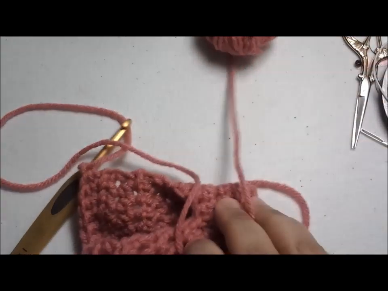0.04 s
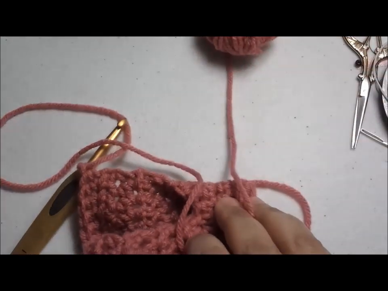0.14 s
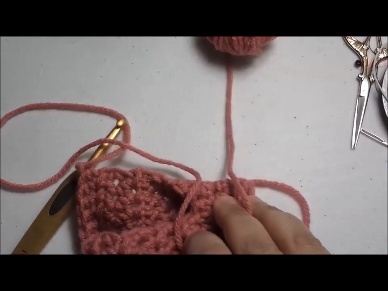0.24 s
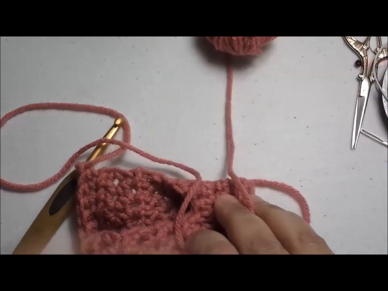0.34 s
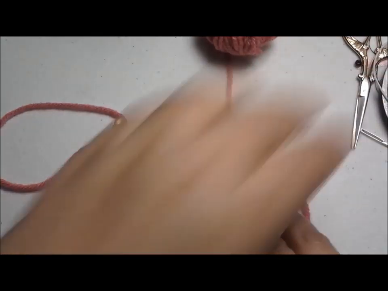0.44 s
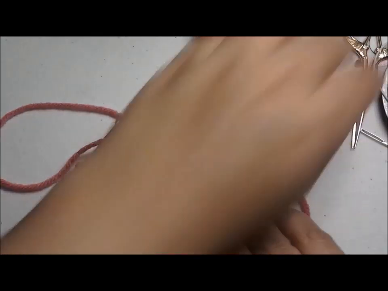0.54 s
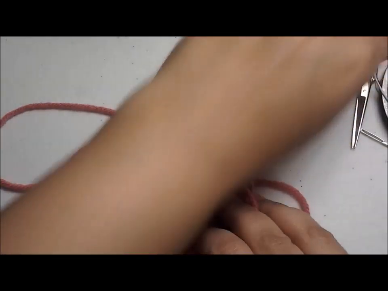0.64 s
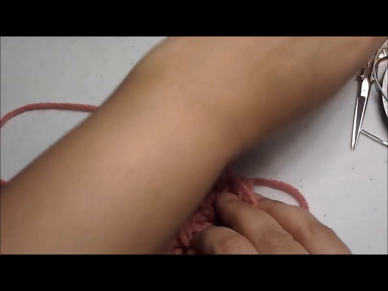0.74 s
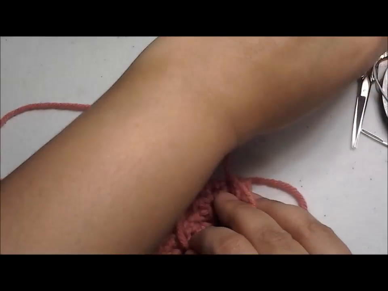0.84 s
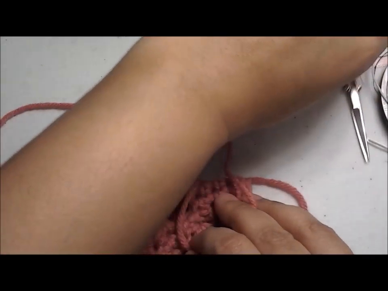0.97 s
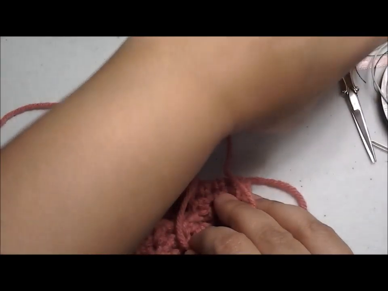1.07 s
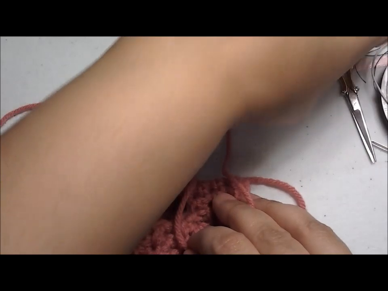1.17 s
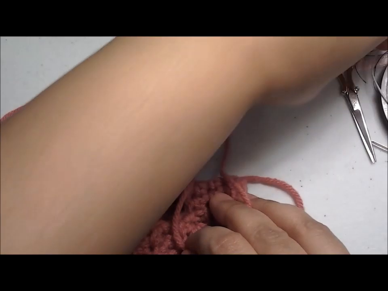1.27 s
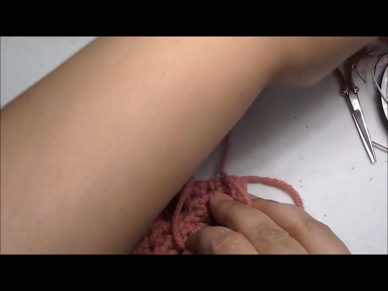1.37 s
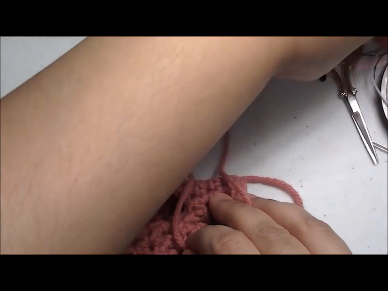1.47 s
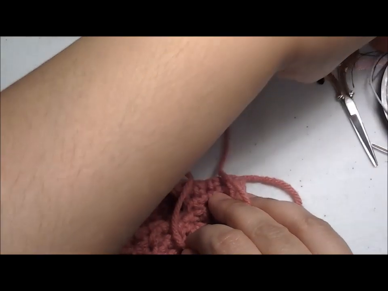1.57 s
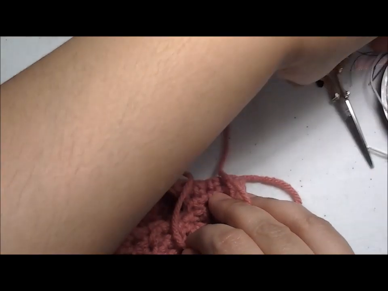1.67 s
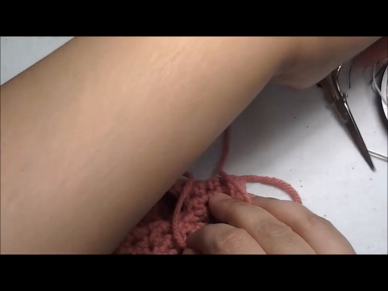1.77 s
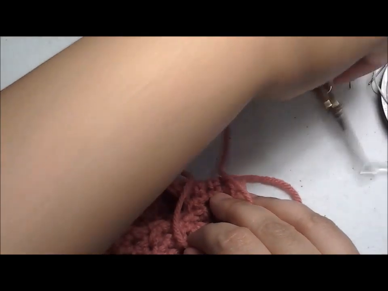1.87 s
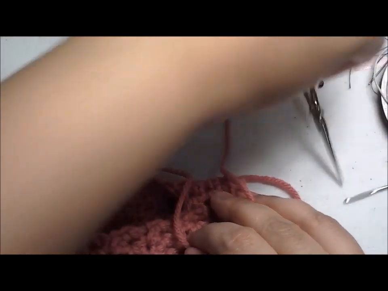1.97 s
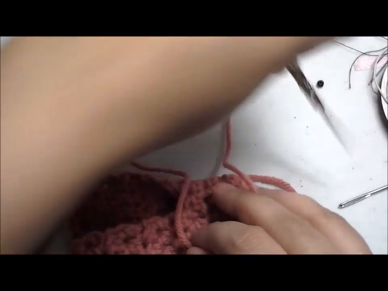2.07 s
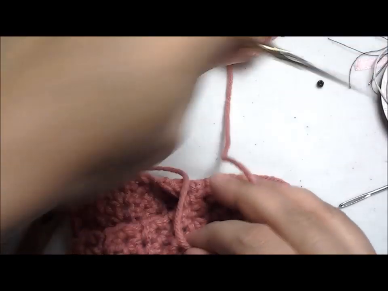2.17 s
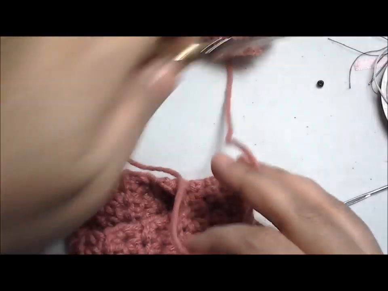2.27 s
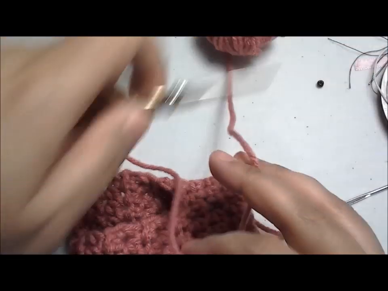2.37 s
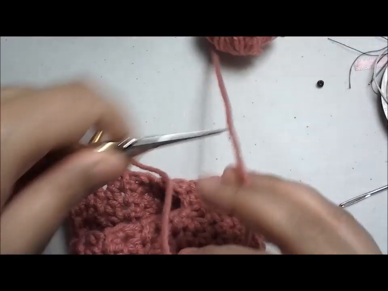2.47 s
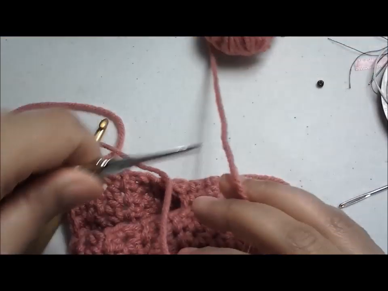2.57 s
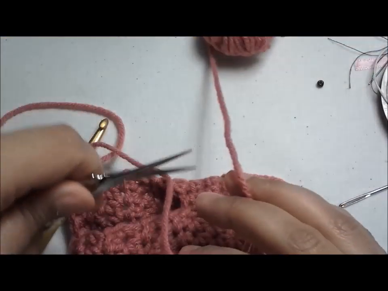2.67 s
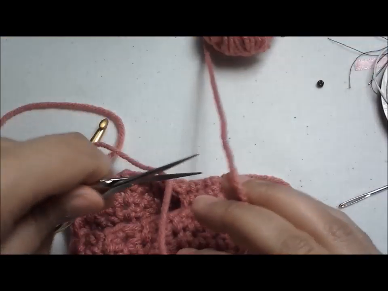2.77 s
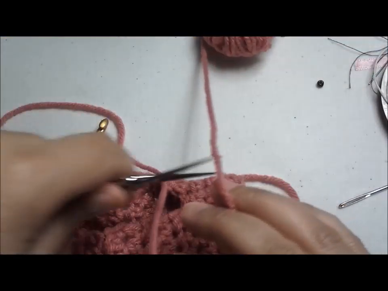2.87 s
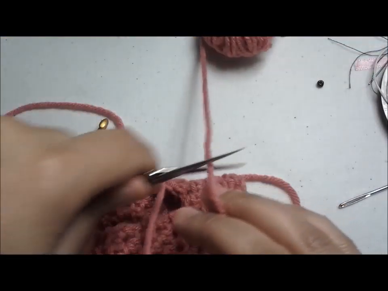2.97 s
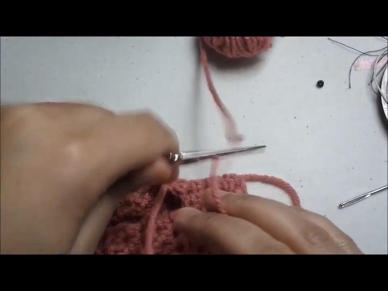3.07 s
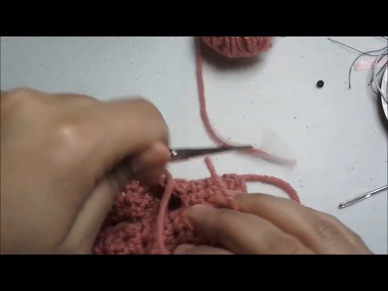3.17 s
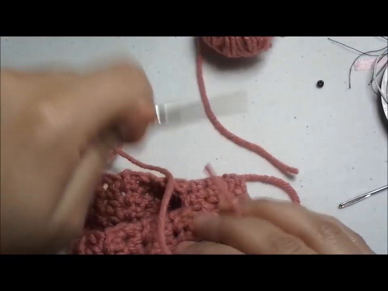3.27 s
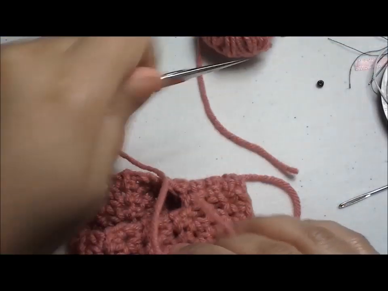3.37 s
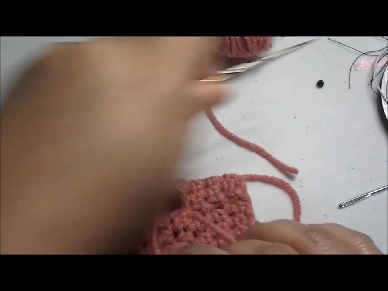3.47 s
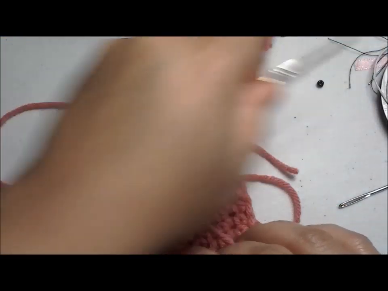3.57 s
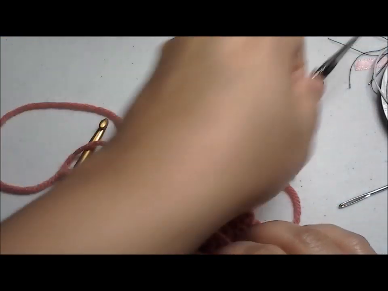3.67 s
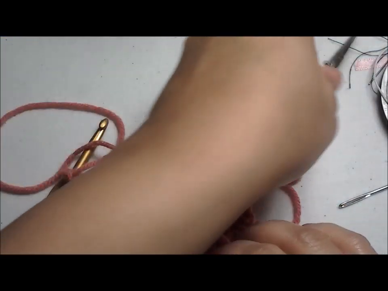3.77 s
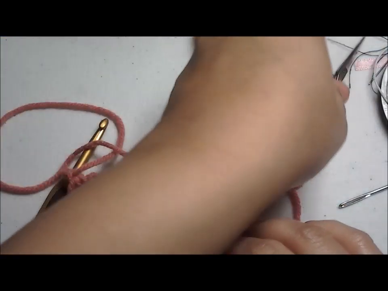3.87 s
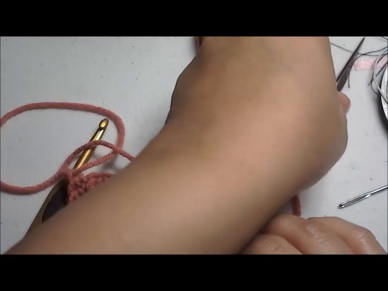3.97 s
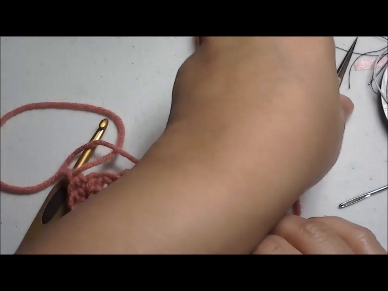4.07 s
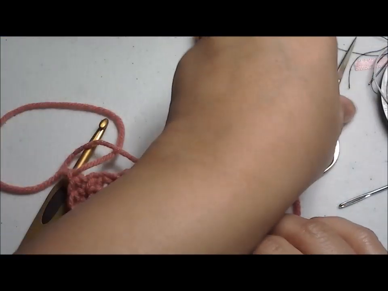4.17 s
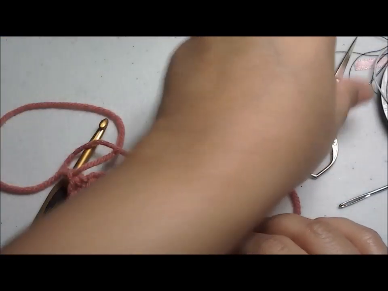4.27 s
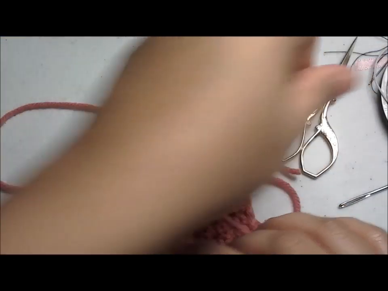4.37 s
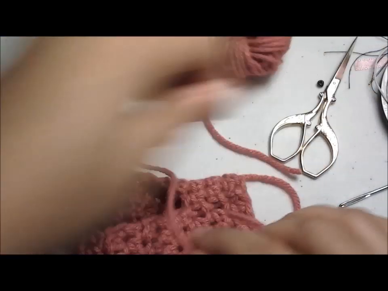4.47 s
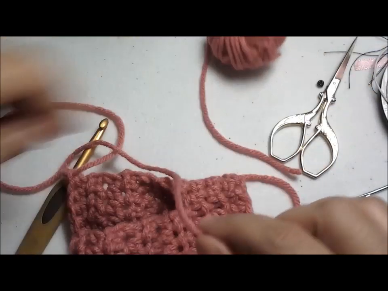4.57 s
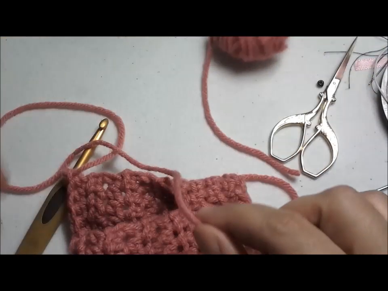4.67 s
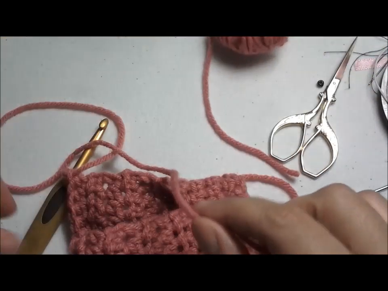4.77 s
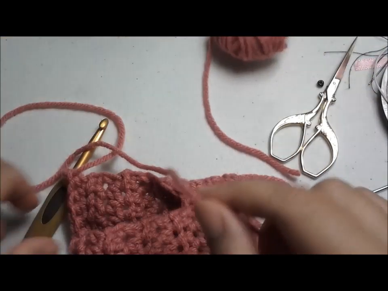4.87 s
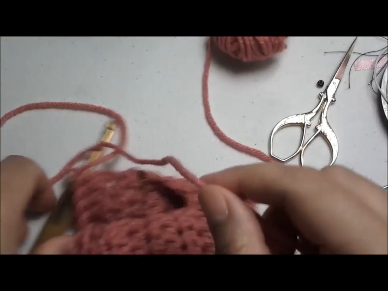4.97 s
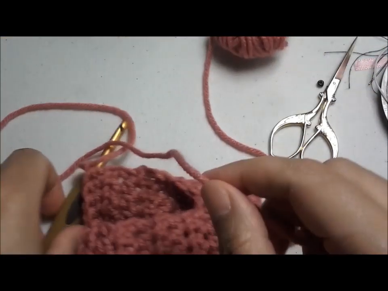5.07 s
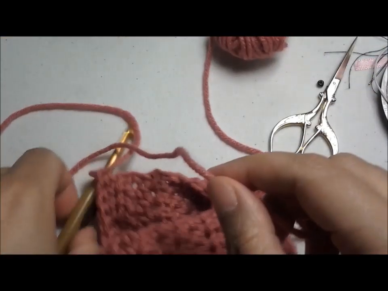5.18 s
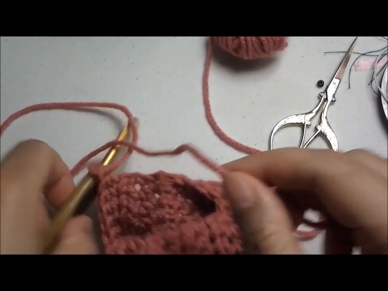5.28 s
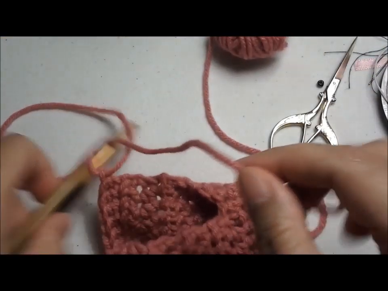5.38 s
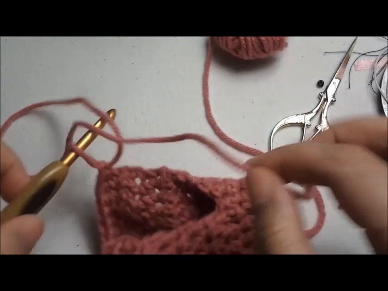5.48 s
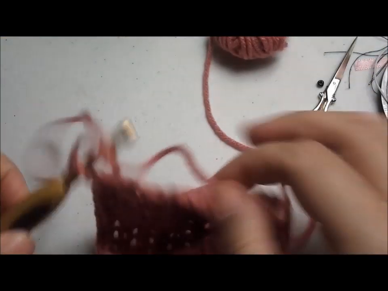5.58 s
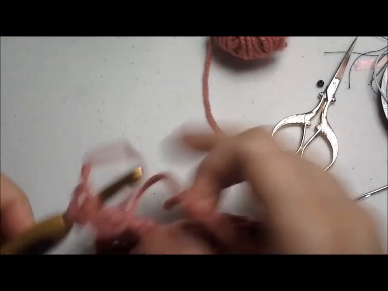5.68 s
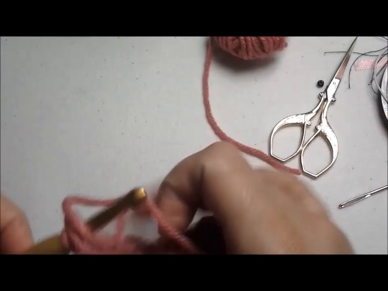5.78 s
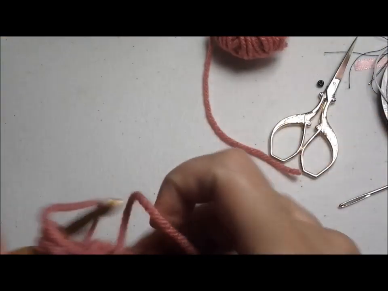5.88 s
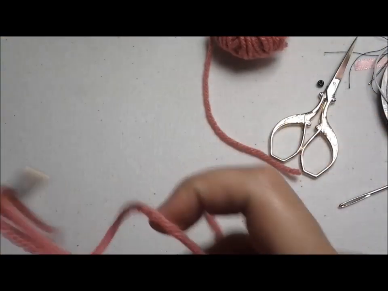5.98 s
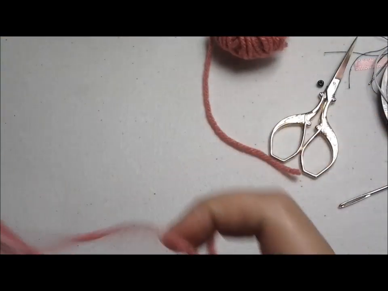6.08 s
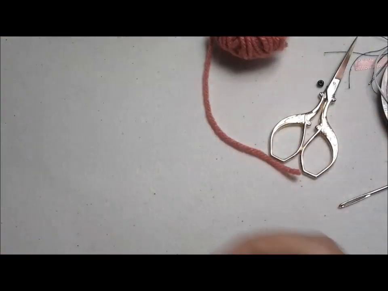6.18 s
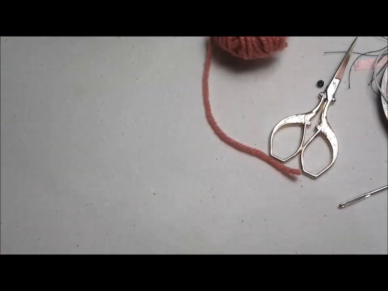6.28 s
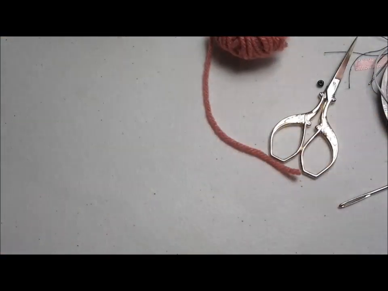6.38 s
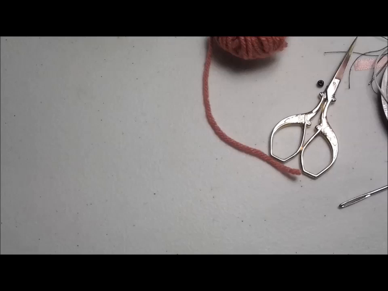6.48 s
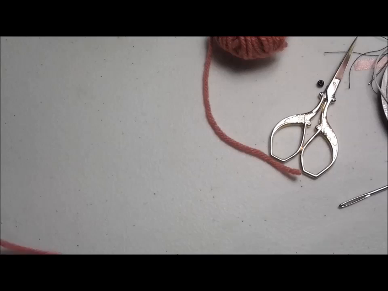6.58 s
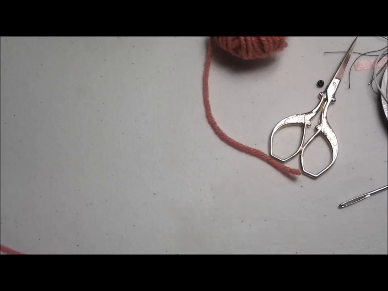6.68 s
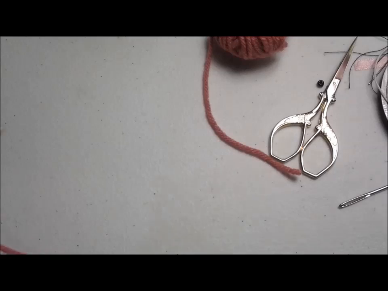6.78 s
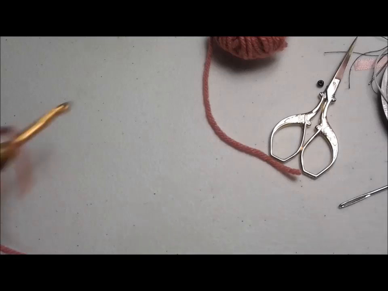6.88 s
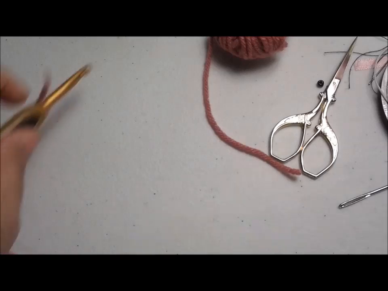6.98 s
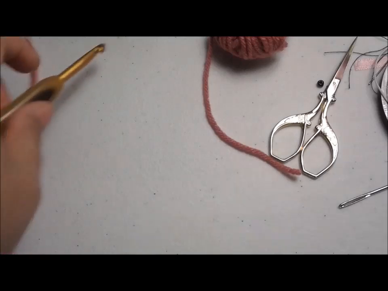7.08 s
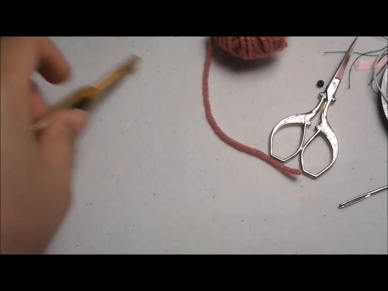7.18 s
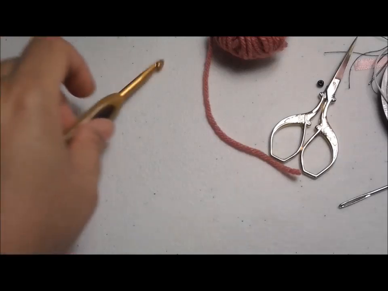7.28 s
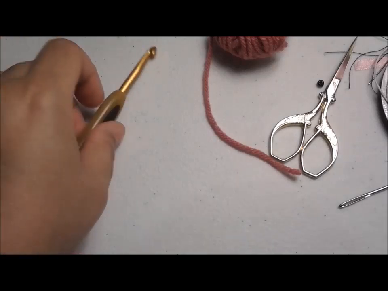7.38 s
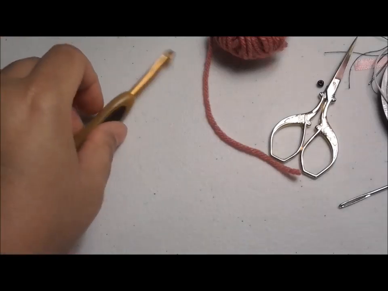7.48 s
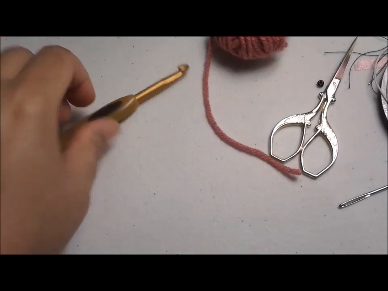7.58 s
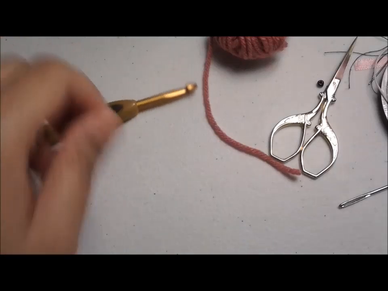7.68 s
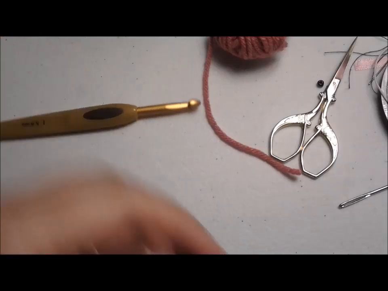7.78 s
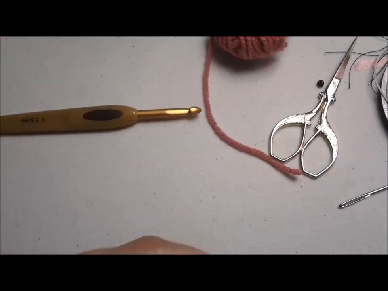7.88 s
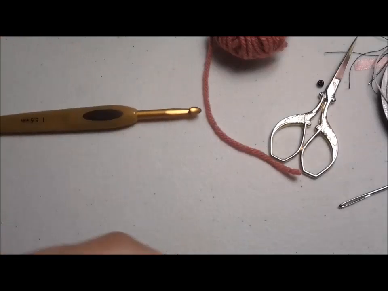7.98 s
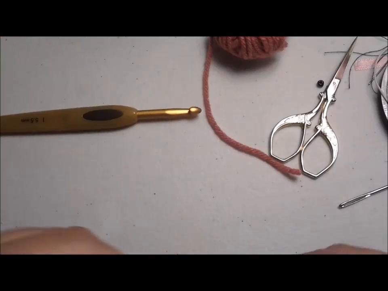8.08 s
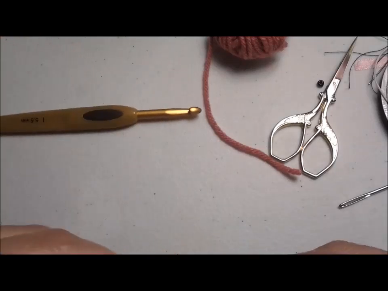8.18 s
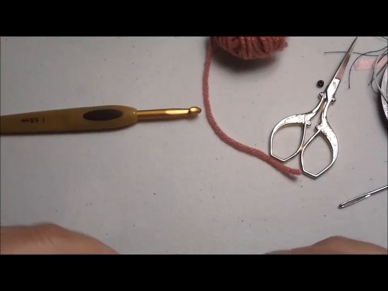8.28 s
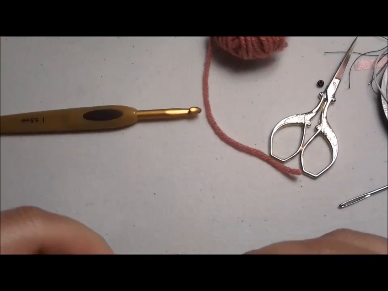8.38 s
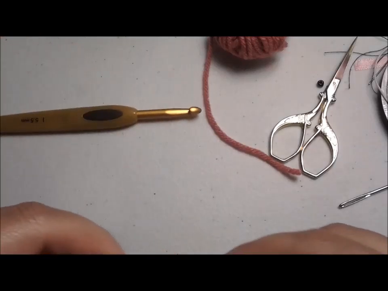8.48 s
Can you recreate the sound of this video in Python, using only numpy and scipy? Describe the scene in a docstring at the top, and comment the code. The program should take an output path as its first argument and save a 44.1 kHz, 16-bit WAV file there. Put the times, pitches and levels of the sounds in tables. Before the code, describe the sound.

Small scissors scrape off a table, snip yarn and clatter back down, then a crochet hook taps the tabletop over a low hum.

```python
"""A small room with a humming appliance. Small steel scissors are dragged off a table, snip a strand of
yarn and are dropped back; a crochet hook is picked up and laid down. Table contacts ring bright treble
resonances and the top's boom and knock: taps as a few quick clicks, slides as random bumps.
The blades crunch through the fibres and click shut; wool and sleeve brush with a soft hiss."""
import sys
import numpy as np
from scipy import signal
from scipy.fft import rfft, irfft, next_fast_len
from scipy.io import wavfile

SR = 44100
rng = np.random.default_rng(int(sys.argv[2]) if len(sys.argv) > 2 else 0)


def materialize(psi):
    """Save the field psi as 16-bit PCM at rate SR to the path in sys.argv[1].

    A 1-D psi becomes a single channel; in a 2-D psi each row is a channel.
    """
    bounded = np.clip(np.atleast_2d(psi).T, -1, 1)
    quanta = np.round(bounded * 32767).astype(np.int16)
    wavfile.write(sys.argv[1], SR, quanta)


N = 376613


def from_db(db):
    """Gain of a level in dB."""
    return 10 ** (np.asarray(db) / 20)


def rms_one(x):
    """Scale to rms 1."""
    return x / np.sqrt(np.mean(x ** 2) + 1e-20)


def butter(x, order, hz, kind):
    """Butterworth filter."""
    return signal.sosfilt(signal.butter(order, hz, kind, fs=SR, output="sos"), x)


def drift(rate_hz):
    """Slow random wander, rms 1."""
    step = 40
    r = np.exp(-2 * np.pi * rate_hz * step / SR)
    slow = signal.lfilter([1], [1, -2 * r, r * r], rng.standard_normal(N // step + 2002))[2000:]
    return np.interp(np.arange(N) / step, np.arange(len(slow)), rms_one(slow))


def strokes(start_s, hold_s, level_db, rise_db_per_s, fall_db_per_s):
    """Gain of movements that swell, hold and fade."""
    t, top_db = np.arange(0, N, 32) / SR, -200
    for start, hold, db in zip(start_s, hold_s, level_db):
        rise_db = rise_db_per_s * np.maximum(start - t, 0)
        fall_db = fall_db_per_s * np.maximum(t - start - hold, 0)
        top_db = np.maximum(top_db, db - rise_db - fall_db)
    return np.interp(np.arange(N) / SR, t, from_db(top_db))


def decay(clicks, t60_s):
    """Exponential tail after each click."""
    return signal.lfilter([1], [1, -from_db(-60 / (t60_s * SR))], clicks + 1e-18)


def ring(clicks, hz, t60_s):
    """One mode: a unit click starts a decaying sine of height 1."""
    r, w = from_db(-60 / (t60_s * SR)), 2 * np.pi * hz / SR
    return signal.lfilter([0, np.sin(w)], [1, -2 * r * np.cos(w), r * r], clicks + 1e-18)


def near(centre_hz, db_per_oct, second_hz=None, second_db=0.):
    """Mode weighting in dB: falls away from the one or two rings a contact favours."""
    def away(hz, centre):
        return -db_per_oct * np.abs(np.log2(hz / centre))
    if second_hz is None:
        return lambda hz: away(hz, centre_hz)
    return lambda hz: np.maximum(away(hz, centre_hz), second_db + away(hz, second_hz))


def struck(modes, t_s, peak_db, favour, spread_db, span_s=0., contacts=1, swell_t60_s=None):
    """Blows of quick, weakening contacts; each hits every mode with its own strength and sign."""
    late = np.sort(rng.random((len(t_s), contacts)), axis=1)
    late_s = (late - late[:, :1]) * np.reshape(span_s, (-1, 1))
    at = np.round((np.reshape(t_s, (-1, 1)) + late_s) * SR).astype(int)
    rebound_db = -3.5 * np.arange(contacts)
    luck = rng.standard_normal((len(t_s), len(modes), 2, contacts))
    out = np.zeros(N)
    for k, (hz, level_db, t60_s) in enumerate(modes):
        blow_db = np.reshape(peak_db + level_db + favour(hz), (-1, 1)) + rebound_db
        drive = np.zeros(N)
        np.add.at(drive, at, from_db(blow_db + spread_db * luck[:, k, 0]) * np.sign(luck[:, k, 1]))
        if swell_t60_s:   # a burst at the mode's pitch: the ring swells before it dies
            drive = ring(drive, hz, swell_t60_s) * 2 * np.log(1000) / (swell_t60_s * SR)
        out += ring(drive, hz, t60_s)
    return out


# Spot touched by each handling: from t/s, scratch f/Hz, second treble ring f/Hz, its level/dB,
# treble fall-off/(dB/oct), boom centre f/Hz, knock centre f/Hz, chatter level/dB, lead-in level/dB
SPOTS = [(0.0, 3140, 5000, -6, 15, 198, 670, -1, -22), (0.9, 3600, 5000, -7, 16, 384, 1210, -1, -12),
         (1.3, 3530, 5000, -5, 40, 250, 1200, -0.5, -3), (1.52, 3500, 6600, -8.5, 27, 254, 990, -4.5, -1),
         (1.6, 3530, 5400, -2, 23, 252, 1180, -4, -6), (1.85, 3540, 4500, -5, 37, 384, 1100, -3.5, -18),
         (3.5, 4400, 3500, -4, 40, 320, 780, -1.5, -25), (4.02, 3440, 5000, -4.5, 25, 320, 687, 0.5, -24),
         (4.24, 4900, 3700, -3, 17.5, 278, 644, -1, -12), (4.275, 4900, 3800, -2.5, 24, 201, 1405, 0, -25),
         (4.301, 3900, 5000, -9, 25, 283, 608, -2, -13), (4.32, 4870, 3800, 0.5, 13, 218, 640, -6.5, -21),
         (4.348, 3780, 5000, -16, 30, 180, 1110, -4, -20), (5.0, 3340, 5300, -4.5, 37, 230, 745, -2.5, -7),
         (5.249, 3260, 2380, -2, 26.5, 201, 647, -4.5, -14), (5.29, 3400, 2380, 0, 25, 294, 645, -2, -15),
         (7.3, 3610, 5000, -1.5, 45, 203, 810, -1.5, -17),
         (7.43, 3570, 5200, -7.5, 42, 277, 604, -1.5, -17), (7.599, 3600, 5200, -7, 45, 252, 652, 1, -2),
         (7.69, 3500, 5200, -7, 41, 267, 640, 4, -10), (8.1, 5560, 3600, -1, 20, 201.6, 830, 2, -20)]


def spot(t_s):
    """Row of SPOTS in use at each time."""
    return np.maximum(np.searchsorted(np.array(SPOTS)[:, 0], t_s, "right") - 1, 0)


def rubbed(modes, gain, bumps_per_s, uneven_db, favour=None):
    """Random, uneven surface bumps ring the modes, most those the spot favours."""
    sizes = from_db(uneven_db * np.minimum(rng.exponential(1, N), 3)) * rng.choice([-1, 1], N)
    bumps = gain * rms_one(sizes * (rng.random(N) < bumps_per_s / SR))
    # a steadily fed mode builds up with the root of its ring time
    build_up = np.sqrt(sum(from_db(2 * db) * t60_s for _, db, t60_s in modes) * SR / (4 * np.log(1000)))
    out, rows = np.zeros(N), spot(np.arange(N) / SR)
    for k, (hz, level_db, t60_s) in enumerate(modes):
        weight = 1 if favour is None else from_db(favour(hz))[rows]
        out += (-1) ** k * from_db(level_db) * ring(bumps * weight, hz, t60_s)
    return out / build_up


# Room noise spectrum: f/Hz, relative density/dB
AIR_SPECTRUM = [(25, -25.5), (40, -13.5), (60, 1.5), (95, 2), (135, 0.5), (165, -7.5), (225, -5),
                (290, -11.5), (373, -19.5), (500, -14.5), (850, -17), (1300, -18.5), (1800, -26),
                (2300, -27), (3200, -28.5), (5000, -27.5), (7300, -35.5), (8000, -53), (9000, -71)]


def room_tone(level_db=-55):
    """Steady coloured noise of air and microphone."""
    size = next_fast_len(N)
    bin_hz = np.maximum(np.fft.rfftfreq(size, 1 / SR), 1)
    hz, db = np.transpose(AIR_SPECTRUM)
    colour = from_db(np.interp(np.log(bin_hz), np.log(hz), db))
    air = irfft(rfft(rng.standard_normal(size)) * colour, size)[:N]
    return from_db(level_db + 0.45 * drift(rate_hz=0.94)) * rms_one(air)


# Motor lines: f/Hz, rms level/dB
HUM_LINES = [(120, -52), (835, -78), (1663, -81.5)]


def appliance_hum():
    """A motor's steady lines, each wavering slightly in level."""
    t = np.arange(N) / SR
    return sum(np.sqrt(2) * from_db(db + 0.24 * drift(rate_hz=3.4)) * np.sin(2 * np.pi * hz * t)
               for hz, db in HUM_LINES)


def reflections(x, t60_s=0.28, level_db=-8.5, gap_s=0.00042):
    """Dense room reflections: a noise tail dying away after a short gap."""
    t = np.arange(SR // 2) / SR
    tail = rng.standard_normal(len(t)) * from_db(-60 * t / t60_s) * (t > gap_s)
    return from_db(level_db) * signal.fftconvolve(x, tail / np.linalg.norm(tail))[:N]


# Wool and sleeve movements: t/s, hold/s, level/dB
BRUSH_STROKES = [(3.52, .05, -72), (3.637, 0.033, -66), (4.69, 0.17, -72), (5.633, .27, -75),
                 (5.929, 0.5, -68), (6.806, 0.31, -76)]
# Fibre hiss bands: f/Hz, width/Hz, relative level/dB
BRUSH_BANDS = [(3780, 600, -6), (4240, 740, 7), (5700, 400, 5)]


def brushing():
    """Soft fibres give a smooth hiss in a few wide bands."""
    hiss = sum(from_db(db) * signal.lfilter(*signal.iirpeak(hz, hz / width_hz, SR), rng.standard_normal(N))
               for hz, width_hz, db in BRUSH_BANDS)
    return strokes(*np.transpose(BRUSH_STROKES), rise_db_per_s=254, fall_db_per_s=93) * rms_one(hiss)


# Bright treble resonances heard in every table contact: f/Hz, level/dB, t60/s
TREBLE_MODES = [(2380, 0.5, 0.0096), (2654, -16.5, 0.0046), (3090, 6, 0.0051), (3185, -14.5, 0.058),
                (3423, 0.5, 0.0075), (3590, -1, 0.016), (3733, -3.5, 0.017), (3936, -3, 0.013),
                (4200, -2.5, 0.0036), (4140, -6.5, .02), (4420, -0.5, 0.0098), (4480, -2, 0.0061),
                (4830, 3.5, 0.0068), (5294, -3, 0.012), (5090, -5, 0.0054), (5540, 0, 0.0082),
                (5980, -3.5, 0.013), (6230, -5.5, 0.0084), (6630, -4.5, 0.0078), (7270, -16, 0.0039)]
# Table top modes, low boom and higher knock: f/Hz, level/dB, t60/s
BOOM_MODES = [(86, -7, .15), (126, 4, 0.15), (157.4, -1, 0.099), (215.5, -0.5, 0.074), (260, -3, 0.055),
              (301.6, 2, 0.06), (340.3, 0.5, 0.079), (374, 3, 0.062), (433, -1, 0.07)]
KNOCK_MODES = [(485, -0.5, 0.025), (641.4, -4.5, 0.051), (741, -1.5, 0.031), (836, -1, 0.019),
               (1011, -4, 0.024), (1195, -3, 0.028), (1321, -2.5, 0.035), (1538, -3, 0.023),
               (1663, -1.5, 0.019), (1940, -3.5, 0.026)]
# Tool touching table: t/s, treble level/dB, boom level/dB, knock level/dB, span/s, favoured treble f/Hz
TAPS = [(0.0503, -54.5, -48.5, -53.5, 0.0051, 3200), (0.9621, -39.5, -38.5, -45.5, 0.005, 4200),
        (0.9836, -34, -38.5, -54, 0.0081, 3240), (0.998, -36, -41, -43.5, .006, 4860),
        (1.008, -43, -57, -58, 0.0064, 4200), (1.027, -40, -62, -65, 0.006, 3900),
        (1.046, -58, -44, -67, .004, 3600), (1.0594, -40.5, -66, -46, 0.0031, 4500),
        (1.077, -56, -41, -57, 0.004, 3600), (1.087, -48, -65, -57, 0.0038, 4500),
        (1.098, -47, -65, -58, .004, 3300), (1.1124, -42.5, -64, -45.5, 0.0056, 3680),
        (1.482, -42, -59, -55, 0.0055, 3500), (1.4997, -51, -58, -55, 0.006, 3500),
        (1.537, -40.5, -53, -69, .005, 3460), (1.546, -43, -54.5, -58, 0.004, 6480),
        (1.561, -43.5, -42.5, -47, 0.0054, 3300), (1.568, -41, -46, -49, 0.0054, 3600),
        (1.576, -45.5, -46.5, -46.5, 0.0052, 3400), (1.6743, -55, -63, -63, 0.0088, 3600),
        (1.709, -63, -57.5, -59, 0.0051, 3400), (1.767, -58.5, -67, -58.5, 0.0045, 3530),
        (1.799, -56, -66, -60.5, 0.0057, 3530), (1.885, -53, -47.5, -53.5, 0.0068, 3300),
        (1.9123, -54, -67, -54.5, 0.0059, 3300), (1.9609, -31.5, -39.5, -45.5, 0.0022, 3530),
        (1.967, -45, -50.5, -57, .003, 4400), (1.974, -47, -48, -51, 0.0015, 3400),
        (1.9752, -25.5, -40.5, -48, 0.0046, 3550), (1.991, -24.5, -56.5, -58, 0.0017, 3470),
        (1.996, -33, -62, -51, 0.0075, 3570), (2.022, -36.5, -45, -44, 0.0089, 3260),
        (2.0335, -37.5, -60, -61, 0.0063, 3560), (2.047, -38, -61, -64, 0.0035, 3320),
        (3.5619, -57, -63, -72, 0.0045, 4517), (3.939, -33.5, -43, -41, 0.0018, 4430),
        (3.964, -42, -48.5, -44.5, 0.0025, 4300), (3.98, -53, -56, -52, 0.0015, 4200),
        (3.987, -53, -56, -56, 0.0039, 4260), (4.033, -26.5, -31, -28, 0.0033, 3610),
        (4.2527, -11.5, -23, -20, 0.0036, 4860), (4.263, -39, -40, -37, 0.0043, 4100),
        (4.282, -21.5, -31, -37, 0.0028, 5130), (4.287, -33, -37, -33.5, 0.0049, 4200),
        (4.295, -34, -40, -42.5, 0.0047, 3850), (4.3101, -30, -36, -48, 0.0049, 3800),
        (4.3236, -28.5, -36, -32.5, 0.0025, 4900), (4.3315, -36, -42, -56, 0.0051, 4480),
        (4.342, -48, -40, -40, .005, 3850), (4.376, -45, -49, -55, .005, 3800),
        (5.0454, -51.5, -44.5, -60, 0.0068, 3305), (5.054, -48, -51, -47.5, 0.0074, 3300),
        (5.071, -52, -45, -57.5, 0.0043, 3280), (5.086, -48, -48, -53.5, 0.0052, 3440),
        (5.0969, -45, -34, -47, 0.0053, 3250), (5.126, -58, -47.5, -54.5, .005, 3300),
        (5.2814, -49, -51.5, -52, 0.0035, 3200), (5.3004, -47, -53, -50, .004, 2700),
        (7.3125, -24, -37, -36, 0.0024, 3800), (7.316, -35.5, -43, -36, 0.0051, 3600),
        (7.3244, -38, -58, -43, 0.0053, 3550), (7.337, -48, -56, -48, 0.0045, 3600),
        (7.3876, -47.5, -65, -51, 0.0035, 3730), (7.399, -61, -65, -64, 0.0026, 3600),
        (7.404, -54, -58, -62, .003, 3600), (7.443, -46.5, -54.5, -50, 0.0046, 4200),
        (7.4808, -51, -41, -54, 0.0045, 3520), (7.54, -47.5, -39, -52, 0.0057, 3520),
        (7.633, -44, -36, -51, 0.0069, 3650), (7.64, -37.5, -34, -46, .01, 3670),
        (7.65, -39, -40, -45, 0.0087, 3750), (7.66, -53, -45, -47, 0.0072, 3750),
        (7.7, -50.5, -42.5, -51, 0.0084, 3400), (7.7451, -46.5, -39.5, -47.5, 0.0048, 4130),
        (7.758, -50, -42, -51.5, 0.0099, 3400), (7.8207, -71, -44, -72, 0.0037, 3510),
        (8.14, -56.5, -66, -70.5, 0.0072, 5520)]


def taps():
    """Each touch rings the treble resonances and the table top."""
    t_s, treble_db, boom_db, knock_db, span_s, treble_hz = np.transpose(TAPS)
    _, _, second_hz, second_db, db_per_oct, boom_hz, knock_hz, _, _ = np.transpose(SPOTS)[:, spot(t_s)]
    treble = struck(TREBLE_MODES, t_s, treble_db, near(treble_hz, db_per_oct, second_hz, second_db),
                    spread_db=2.0, span_s=span_s, contacts=4, swell_t60_s=0.004)
    knock = struck(KNOCK_MODES, t_s, knock_db, near(knock_hz, db_per_oct=0),
                   spread_db=-0.5, span_s=span_s, contacts=3, swell_t60_s=0.0018)
    boom = struck(BOOM_MODES, t_s, boom_db, near(boom_hz, db_per_oct=7.5), spread_db=-0.05)
    return treble + knock + boom


# Tools and hands sliding on the table: t/s, hold/s, treble level/dB, boom level/dB, knock level/dB
SLIDES = [(0.0, 0.023, -54.5, -36, -45), (0.066, 0.23, -67, -52, -60), (0.953, 0.12, -45, -40, -45),
          (1.402, 0.087, -70, -45.5, -66), (1.537, 0.018, -51, -42, -50.5), (1.62, 0.3, -64, -53.5, -61),
          (1.897, 0.095, -60, -43.5, -56), (1.945, 0.0078, -47.5, -43, -47.5),
          (1.977, 0.054, -49, -55, -41.5), (3.96, 0.08, -53.5, -65, -56), (4.046, 0.064, -57, -42, -42),
          (4.185, .02, -61, -52, -57), (4.288, 0.06, -43, -35, -53), (4.394, 0.08, -59, -56, -61),
          (5.047, .03, -55.5, -36, -40.5), (5.077, 0.052, -50, -31, -40), (5.193, 0.086, -62.5, -46, -54),
          (5.299, 0.0056, -65, -55, -53), (7.348, 0.13, -54.5, -46.5, -48), (7.474, 0.11, -60, -40.5, -46),
          (7.585, .01, -65, -48, -54), (7.629, 0.017, -58, -29.5, -37.5), (7.685, 0.16, -61, -35.5, -47),
          (7.688, 0.021, -50, -38, -39.5)]
# Chatter after a tap, rows treble, boom, knock: level re tap/dB, t60/s
CHATTER = [(1.5, 0.046), (3, 0.05), (-1, 0.097)]


def friction(lead_in_t60_s=0.019):
    """Treble, boom and knock gains: slides, a brief swell of noise into each tap, chatter after it."""
    t_s, *tap_levels_db, _, _ = np.transpose(TAPS)
    start_s, hold_s, *slide_levels_db = np.transpose(SLIDES)
    *_, chatter_db, lead_in_db = np.transpose(SPOTS)[:, spot(t_s)]
    at = np.round(t_s * SR).astype(int)
    gains = []
    for tap_db, slide_db, (offset_db, t60_s) in zip(tap_levels_db, slide_levels_db, CHATTER):
        after, before = np.zeros((2, N))
        after[at] = from_db(tap_db + offset_db + chatter_db)
        before[at] = from_db(tap_db + lead_in_db)
        chatter = decay(after, t60_s)
        lead_in = decay(before[::-1], lead_in_t60_s)[::-1]
        sliding = strokes(start_s, hold_s, slide_db, rise_db_per_s=1199, fall_db_per_s=349)
        gains.append(chatter + lead_in + sliding)
    return gains


def dragging():
    """Dragging gives a fine bright scratch and rumbles the table coarsely."""
    treble, boom, knock = friction()
    _, scratch_hz, second_hz, second_db, db_per_oct, boom_hz, knock_hz, _, _ = np.transpose(SPOTS)
    scratch = near(scratch_hz, 0.59 * db_per_oct, second_hz, second_db)   # broader than a tap
    return (rubbed(TREBLE_MODES, treble, bumps_per_s=1500, uneven_db=2.0, favour=scratch)
            + rubbed(BOOM_MODES, boom, bumps_per_s=900, uneven_db=1.0, favour=near(boom_hz, 13.5))
            + rubbed(KNOCK_MODES, knock, bumps_per_s=1500, uneven_db=0.6, favour=near(knock_hz, 8.0)))


# Onsets of the hardest blows: t/s, level/dB, favoured f/Hz
CRACKS = [(0.999, -39, 4900), (1.9608, -37, 3500), (1.9762, -22, 3500), (1.991, -29, 3800),
          (3.9391, -32.5, 4500), (4.033, -24.5, 3860), (4.2535, -13, 4800), (4.282, -19, 5100),
          (4.3236, -22, 5000), (5.2813, -46, 3400), (5.3007, -49, 3420), (7.3125, -20, 3900),
          (7.444, -40, 3800), (7.746, -43, 4300)]
# Modes of a crack: f/Hz, level/dB, t60/s
CRACK_MODES = [(3550, 1, .006), (4350, -6.5, .004), (5080, -2, .005), (7300, -11, 0.0032),
               (7700, -14.5, 0.0021)]


def cracks():
    """The first instant of a hard blow: one bare contact."""
    t_s, peak_db, bright_hz = np.transpose(CRACKS)
    return struck(CRACK_MODES, t_s, peak_db, near(bright_hz, db_per_oct=11.0), spread_db=0.6)


# Modes of blades and pivot: f/Hz, level/dB, t60/s
BLADE_MODES = [(2300, -4, .009), (2480, 0, .014), (2680, -3, .009), (3350, -5, .008), (4450, -5, .007),
               (5300, -3, .007), (6300, -12, .004), (7300, -13, .004)]
PIVOT_MODES = [(3440, -1, .016), (4300, 1, .022)]
# Blades shearing the strand: t/s, low-mode level/dB, high-mode level/dB
SHEAR_CURVE = [(3.139, -64, -66), (3.141, -49, -55), (3.157, -47, -54), (3.166, -55, -66), (3.18, -53, -67),
               (3.193, -57, -68), (3.205, -62, -64), (3.215, -66, -68)]
# Pivot rubbing as the scissors are carried: t/s, hold/s, level/dB
PIVOT_STROKES = [(3.217, .02, -68), (3.522, 0.029, -67.5), (3.635, 0.046, -66), (3.752, 0.029, -66.5)]


def snip(shut_s=3.1968, shut_db=-35):
    """The edges crunch through the fibres, the blades click shut, the pivot rubs."""
    t = np.arange(N) / SR
    t_s, *levels_db = np.transpose(SHEAR_CURVE)
    low, high = (from_db(np.interp(t, t_s, db, left=-200, right=-200)) for db in levels_db)
    shear = rubbed(BLADE_MODES[:3], low, bumps_per_s=900, uneven_db=3.0)
    shear += rubbed(BLADE_MODES[3:], high, bumps_per_s=3000, uneven_db=2.0)
    click = struck(BLADE_MODES, [shut_s], shut_db, near(2500, db_per_oct=3),
                   spread_db=1.0, span_s=0.002, contacts=2)
    carried = strokes(*np.transpose(PIVOT_STROKES), rise_db_per_s=548, fall_db_per_s=156)
    pivot = rubbed(PIVOT_MODES, carried, bumps_per_s=5400, uneven_db=-5.0)
    return shear + click + pivot


def scene():
    """Close contacts and the cut, their reflections, brushing and the room's background."""
    table = butter(taps() + dragging(), 2, 60.1, "high")   # a small top radiates no deep bass
    table = butter(table, 4, 6800, "low")   # contact softness limits the treble
    blades = butter(snip(), 3, [1900, 7000], "band")   # thin blades radiate no bass
    table += cracks()
    room = reflections(table + from_db(-3.5) * blades)   # the cut is nearest the microphone, so drier
    return (table + blades + room + brushing() + room_tone() + appliance_hum())[None]


def record(dry, ceiling=0.55, cutoff_hz=8500):
    """A small microphone drops the deep bass and rounds peaks; steep treble cut, faint hiss."""
    mic = butter(dry, 3, 45.5, "high")
    mic = ceiling * np.tanh(mic / ceiling)
    mic = signal.sosfilt(signal.cheby2(20, 70, cutoff_hz, fs=SR, output="sos"), mic)
    return mic + from_db(-99) * rng.standard_normal(dry.shape)


dry = scene()
out = record(dry)
materialize(out)
```